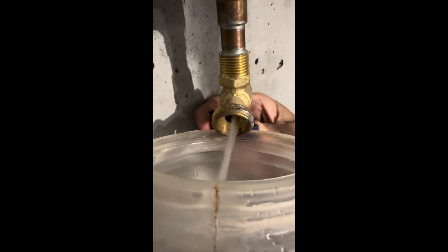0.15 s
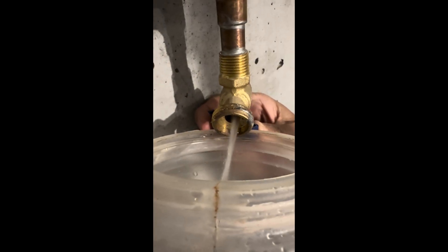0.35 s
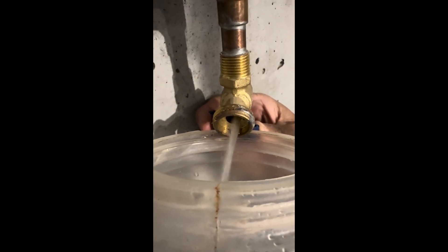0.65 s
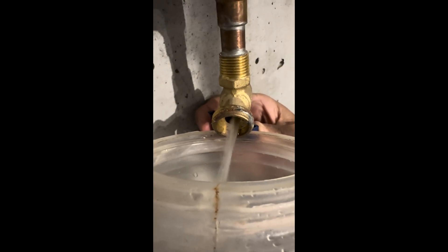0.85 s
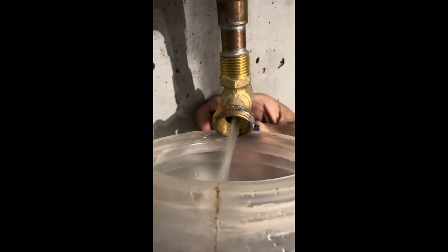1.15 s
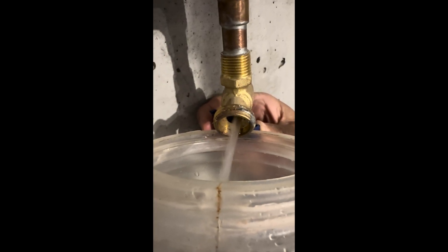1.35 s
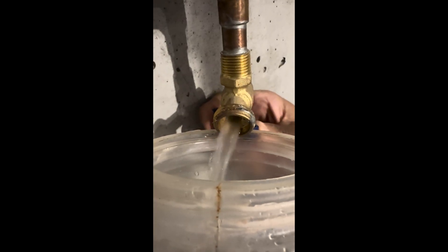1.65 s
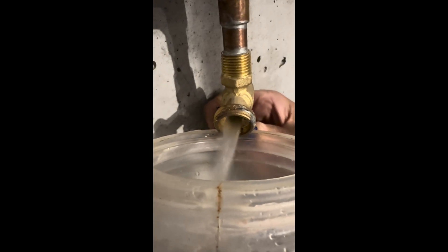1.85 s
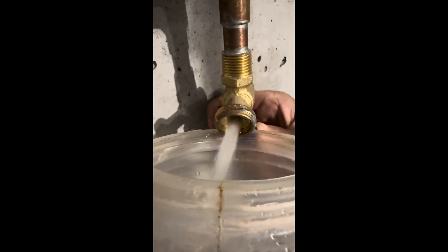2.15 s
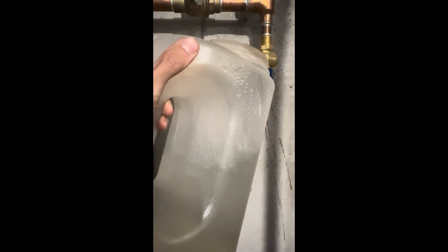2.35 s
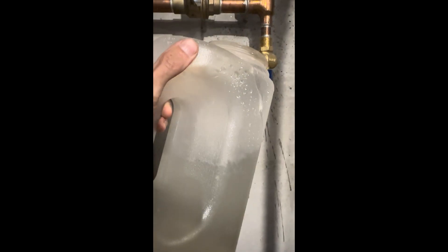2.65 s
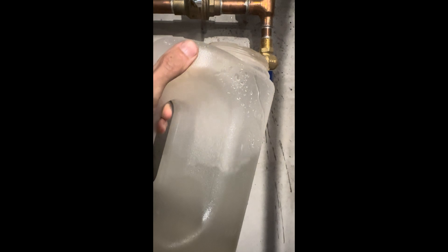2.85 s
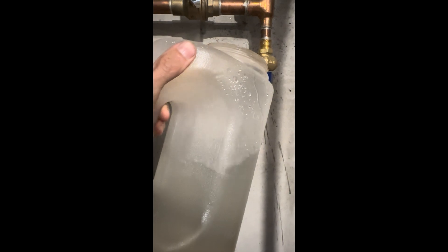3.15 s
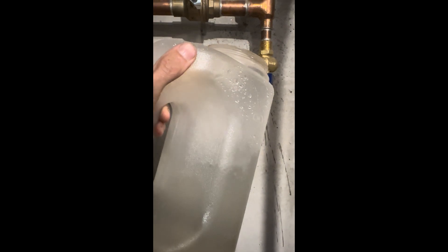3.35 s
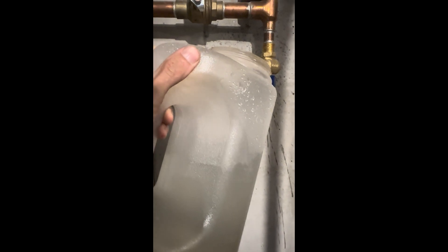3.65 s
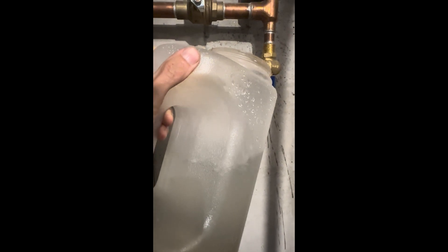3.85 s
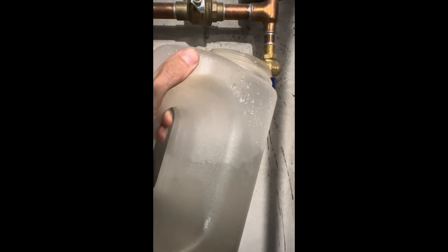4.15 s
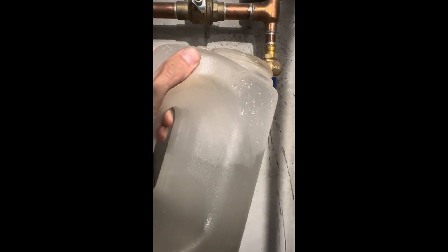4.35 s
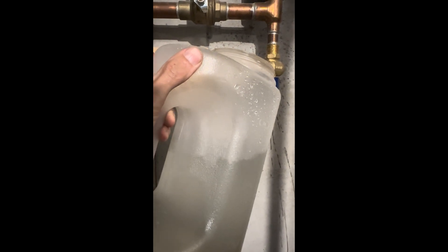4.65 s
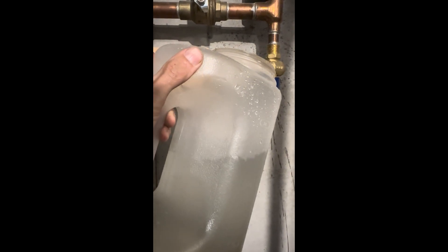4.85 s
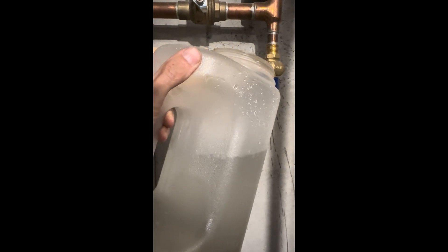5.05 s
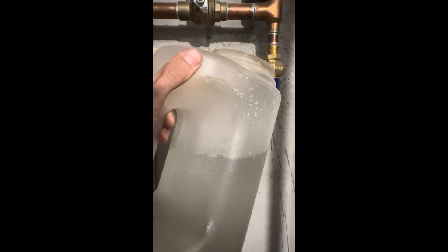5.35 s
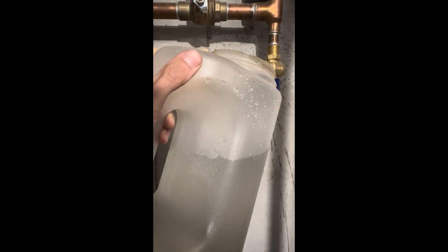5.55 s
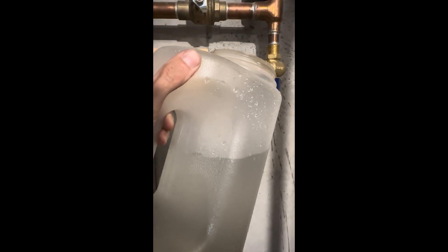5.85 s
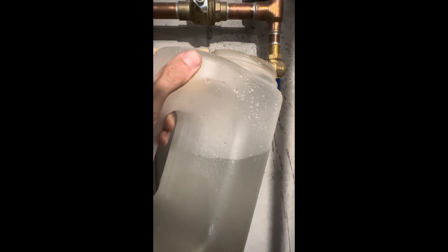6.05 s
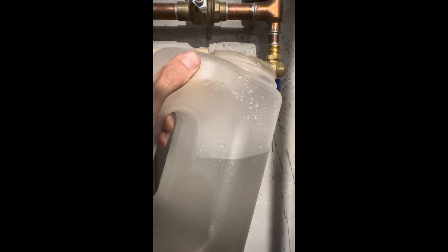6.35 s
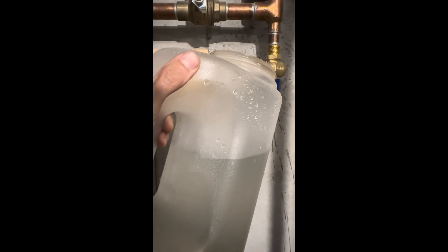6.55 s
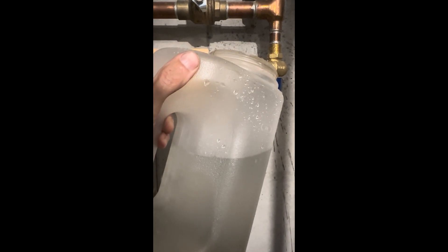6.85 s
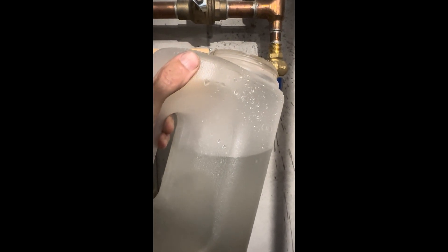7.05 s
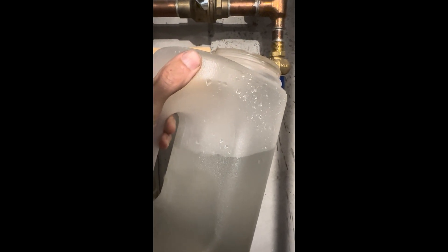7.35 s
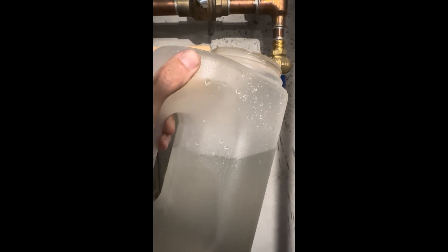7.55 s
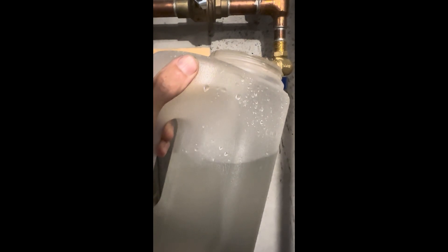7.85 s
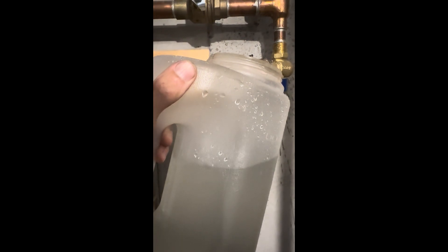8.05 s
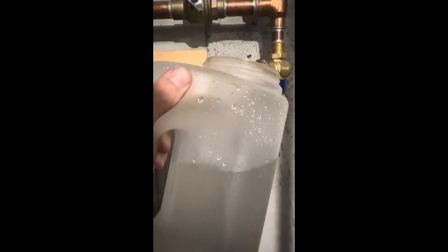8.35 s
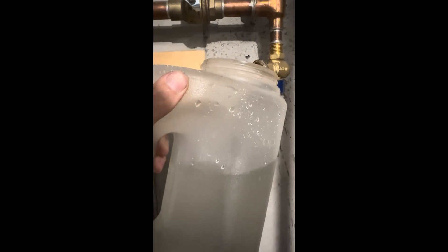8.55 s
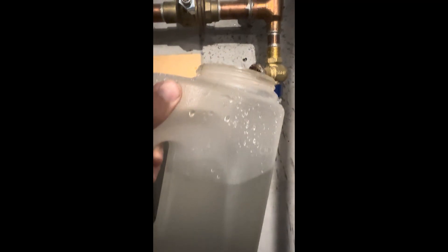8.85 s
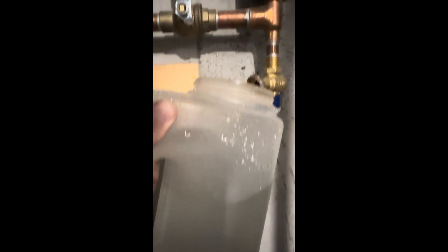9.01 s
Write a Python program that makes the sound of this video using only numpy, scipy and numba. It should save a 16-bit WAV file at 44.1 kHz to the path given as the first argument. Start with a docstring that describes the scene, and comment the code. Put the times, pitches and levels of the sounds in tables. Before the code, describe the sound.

From 0 to 1.6 s a steady thin stream falls into a nearly empty plastic jug, heard close over its mouth: low hollow boom around 200 Hz, busy bubbling, deep gulps and crisp droplet ticks. From 1.6 to 2.2 s the jet widens and hisses more, leaning to the right. At 2.2 s the view jumps beside the half-full jug: the loudest, densest rush, with a higher boom near 310 Hz and soft wall rumble. After 3 s it steadily weakens; by 4.2-5.3 s it is loose splatter and separate smacks, then lumpy, ringing plops until 6.2 s. Around 6.35 s it almost stops. At 6.5 s a short spurt thumps and plops, followed by a thinning dribble of round plinks and small rising chirps until 8.55 s. A few tiny high drips remain from 8.8 to 9.15 s above faint room air and machine hum.

```python
"""Filling a jug from a drain valve

Water runs from a brass drain valve into a hand-held plastic jug in a small utility room.
The jet drives bubbles and spray (many tiny ringing grains) and knocks the air in the jug into a boom:
low while nearly empty, higher once the jug is half full and heard from the side.
Then the flow weakens, stalls, spurts again and ends in single drips; a faint room tone and hum lie below.
"""
import sys
import numpy as np
from scipy import signal
from scipy.fft import rfft, irfft
from scipy.io import wavfile
from scipy.ndimage import uniform_filter1d
from numba import njit

SR = 44100
rng = np.random.default_rng(int(sys.argv[2]) if len(sys.argv) > 2 else 0)


def pcm_store(signal):
    """Save signal as 16-bit PCM."""
    levels = np.round(np.clip(np.atleast_2d(signal), -1, 1) * 32767)
    wavfile.write(sys.argv[1], SR, levels.astype(np.int16).T)


N = 404838
TIME = np.arange(N) / SR
LEAD = 256  # samples kept ahead of the direct sound in each response
HALF_FULL_S = 2.217  # when the jug is first heard half full
# random lesser plops and plinks fall between these times; lesser smacks also end at the second
STRAYS_FROM_S, STRAYS_TO_S = 6.5, 8.55


def from_db(db):
    """Decibels to gain."""
    return 10 ** (np.asarray(db) / 20)


def rms_one(x):
    """Scale to an average strength (rms) of 1."""
    return x / np.sqrt(np.mean(x ** 2) + 1e-20)


def in_time(rows):
    """Read the columns of a time table at every sample, in straight lines between its rows."""
    s, *columns = np.transpose(rows)
    return [np.interp(TIME, s, c) for c in columns]


def gain_at(points, hz):
    """Gains of a spectrum table, one row per dB column."""
    at, *columns = np.transpose(points)
    return from_db([np.interp(np.log(hz + 1), np.log(at), c) for c in columns])


def band(x, low_hz, high_hz, order=2):
    """Keep the sound between two frequencies."""
    sos = signal.butter(order, [low_hz, min(high_hz, .45 * SR)], "band", fs=SR, output="sos")
    return signal.sosfilt(sos, x + 1e-18)


def drift(rate):
    """Random wandering in straight lines between so many new values a second, each of spread 1."""
    knots = rng.standard_normal(N // 20)
    return np.interp(TIME * rate, np.arange(len(knots)), knots)


def add(track, s, sound):
    """Mix a short sound in at time s."""
    start = max(0, round(s * SR))
    track[start:start + len(sound)] += sound[:max(0, N - start)]


def bubble(hz, cycles, rise):
    """A sine that swells to 1 within so many cycles and dies, its pitch rising as it nears the surface."""
    age = np.arange(int(9 * cycles / hz * SR) + 2) * hz / (cycles * SR)
    swell = age * np.exp(1 - age)
    return swell * np.sin(2 * np.pi * cycles * age * (1 + rise * age))


def struck(hz, attack_s, decay_s, rise):
    """A sine that starts sharply and dies away, its pitch rising as it does."""
    t = TIME[:2048]
    envelope = (1 - np.exp(-t / attack_s)) * np.exp(-t / decay_s)
    return envelope * np.sin(2 * np.pi * hz * t * (1 + rise * t / decay_s))


def impacts(per_s, spread_db):
    """Random clicks of either sign, mostly small and a few large."""
    out = np.zeros(N)
    at = np.flatnonzero(rng.random(N) < per_s / SR)
    size = rng.exponential(1, N)[at]
    sign = np.sign(rng.random(N)[at] - .5)
    out[at] = sign * from_db(spread_db * np.minimum(size, 4))
    return out


def grains(clicks, low_hz, high_hz, cycles, rise, tilt_db, count=28):
    """Each click starts a bubble of one of several sizes, and so of one of several pitches."""
    out = np.zeros(N)
    at = np.flatnonzero(clicks)
    dealt = rng.integers(0, count, N)[at]
    for k, hz in enumerate(np.geomspace(low_hz, high_hz, count)):
        # tilt per octave, on top of a strength that grows with pitch
        gain = hz / low_hz * from_db(tilt_db * np.log2(hz / low_hz))
        shape = bubble(hz, cycles, rise) * gain
        starts = at[dealt == k]
        places = starts[:, None] + np.arange(len(shape))
        out += np.bincount(places.ravel(), np.outer(clicks[starts], shape).ravel(), N)[:N]
    return out


def strays(per_s, level_db, low_hz, high_hz, from_s, to_s):
    """Drops at loose intervals, of any pitch in a range, following a level curve: (s, dB, Hz)."""
    chance = rng.random((400, 3))
    s = from_s + (np.arange(len(chance)) + 2 * chance[:, 0]) / per_s
    spread_db = 4 * (-np.log(chance[:, 1] * .95 + .05) - 1)
    db = np.interp(s, TIME, level_db) + spread_db
    hz = low_hz * (high_hz / low_hz) ** chance[:, 2]
    return np.transpose([s, db, hz])[s < to_s]


@njit
def glide(x, angle, radius):
    """Two-pole resonance with a moving centre and width, gain about 1 on top."""
    y = np.zeros(len(x))
    for i in range(2, len(x)):
        r = radius[i]
        y[i] = (1 - r * r) / 2 * (x[i] - x[i - 2]) + 2 * r * np.cos(angle[i]) * y[i - 1] - r * r * y[i - 2]
    return y


def jug_response(modes, view, flutter_db, flutter_t60, room_db, room_t60, ports_hz, size=32768):
    """Sum and difference impulse responses: direct sound, flutter between the jug walls, room, air modes."""
    t = np.arange(size) / SR
    hz = np.arange(size // 2 + 1) * SR / size
    echoes = np.zeros((2, size))
    for level_db, t60 in ((flutter_db, flutter_t60), (room_db, room_t60)):
        # noise that falls by 60 dB in t60 seconds
        tail = rng.standard_normal((2, size)) * from_db(-60 * t / t60) * (t > .001)
        echoes += from_db(level_db) * band(tail, 445, 22600, order=1) / np.sqrt(np.sum(tail[0] ** 2))
    # above ports_hz the direct sound differs between the ports, a quarter cycle from the sum
    direct = np.array([np.ones(len(hz)), -1j * hz ** 2 / (hz ** 2 + ports_hz ** 2)])
    spectrum = rfft(echoes) + direct
    gains = gain_at(view, hz)
    for centre, width, db in modes:
        bell = 1 / (1 + (2 * (hz - centre) / width) ** 2) ** 1.81
        gains[0] *= np.sqrt(1 + (from_db(2 * db) - 1) * bell)
    # minimum phase: resonances ring after the blow
    phase = rfft(2 * irfft(np.log(gains[0]))[:size // 2], size).imag
    return np.roll(irfft(spectrum * gains * np.exp(1j * phase)), LEAD, axis=1)[:, :size // 2]


def in_jug(x, echo_db=0):
    """Sound from one spot in the jug; each stretch of the pour meets the jug as full as it then is."""
    # Modes and nulls of the air space as the jug fills.
    # Each row: centre in Hz, width in Hz, boost in dB.
    empty_modes = [(156.8, 25.5, 14), (231.2, 11.7, 9), (399, 130, 13), (680, 83, 14.5), (1146, 260, -8),
                   (1310, 53, 13), (1593, 123, 9), (2050, 37, 6), (2273, 410, -20), (2670, 190, 7),
                   (3430, 360, -13), (4660, 270, 0.5), (5010, 380, -5), (5710, 500, 8)]
    gush_modes = [(234, 36, 4.5), (407, 87, 6.5), (680, 95, 11), (1320, 32, 10.5), (1080, 51, 8),
                  (1580, 65, 13), (2124, 47, 8.5), (3020, 580, -9), (4000, 1100, 5.5), (5700, 660, 9)]
    half_modes = [(257.7, 31, 10.5), (350, 38, 8), (406, 29, -3.5), (670, 20, -1), (780, 250, -5),
                  (891, 27, 7.5), (1030, 190, 0.5), (1670, 59, 3.5), (1960, 310, 5.5), (3180, 1300, 3),
                  (4210, 104, 2.5), (5530, 140, 5), (6470, 330, 1.5)]
    full_modes = [(424, 86, 9.5), (606, 43, 4), (880, 330, 3), (814, 26, 4), (1775, 103, 13.5),
                  (2200, 370, -7.5), (2900, 680, -5), (2500, 48, 7.5), (3510, 180, 4.5), (5500, 730, 2.5)]
    lowered_modes = [(424, 69, 8.5), (606, 43, 2), (850, 190, 3), (1350, 400, -2), (2110, 230, 5),
                     (2980, 200, 2), (3600, 230, 3.5), (5600, 550, 1.5)]
    # Gain of the sum and difference per view: over the mouth, with the jug tilted, and beside it.
    # The sum has a deep dip near 13 kHz.
    # Each row: frequency in Hz, gain of the sum in dB, gain of the difference in dB.
    over_mouth = [(100, 3, 9), (256, 6, -4), (540, -8.5, 1), (780, -2, 8.5), (1220, -10, 6),
                  (1530, -2.5, 4.5), (2100, -1.5, -5), (3200, -7.5, -11), (5300, 1.5, -2), (6360, 2, -15),
                  (8150, 4.5, 1.5), (10540, 1, 4.5), (13000, -36, 3), (14700, 0, 7)]
    tilted = [(100, 9.5, 14), (230, 4, 3), (515, -2, 0), (770, 4.5, 13), (1370, -2.5, 7), (2900, 1, -4),
              (4970, -6.5, 0.5), (6370, -1.5, -14), (8400, 1.5, 0), (10800, -4.5, 1), (12900, -50, -3),
              (14700, -7, 0)]
    beside = [(100, 10.5, -14), (298, 2.5, -17), (590, 2.5, -7.5), (1060, 1.5, -15), (1810, -2.5, -53),
              (2750, -4, -3), (3950, -1, -6.5), (4890, -6.5, -3), (6100, 1.5, -17.5), (8440, -0.5, -1),
              (10730, -9.5, -3.5), (12800, -86, -7.5), (14800, -11.5, -2.5)]
    responses = [
        jug_response(empty_modes, over_mouth, flutter_db=echo_db - 5.0, flutter_t60=0.1,
                     ports_hz=150, room_db=-12.0, room_t60=0.1),
        jug_response(gush_modes, tilted, flutter_db=echo_db - 5.5, flutter_t60=0.036,
                     ports_hz=150, room_db=-8, room_t60=0.26),
        jug_response(half_modes, beside, flutter_db=echo_db - 1.0, flutter_t60=0.049,
                     ports_hz=5000, room_db=-8.0, room_t60=0.49),
        jug_response(full_modes, beside, flutter_db=echo_db + 0.9, flutter_t60=0.057,
                     ports_hz=5000, room_db=-15.0, room_t60=0.41),
        jug_response(lowered_modes, beside, flutter_db=echo_db + 1.5, flutter_t60=0.06,
                     ports_hz=5000, room_db=-10.5, room_t60=0.52)]
    # the jug is tilted and the jet widens; the flow stalls; the jug is lowered from the valve
    gush_s, stall_s, lowered_s = 1.61, 6.44, 8.03
    edges = [round(s * SR) for s in (0, gush_s, HALF_FULL_S, stall_s, lowered_s)] + [N]
    out = np.zeros((2, N + LEAD))
    for start, end, response in zip(edges, edges[1:], responses):
        heard = signal.fftconvolve(x[None, start:end], response, axes=1)[:, :N + LEAD - start]
        out[:, start:start + heard.shape[1]] += heard
    return out[:, LEAD:]


def at_level(pair, db, window_s):
    """Hold the running level of a grainy sound close to a curve."""
    window = int(window_s * SR)
    power = uniform_filter1d(uniform_filter1d(pair[0] ** 2, window), window)
    return pair * from_db(db) / np.sqrt(np.abs(power) + 1e-4 * np.mean(power))


def room_tone():
    """Faint steady air of the room, much alike on both sides, and the hum of a machine."""
    # Colour of the room's air noise. Each row: frequency in Hz, relative density in dB per Hz.
    colour = [(18, -36), (30, -14), (71, -6), (295, 4), (569, -13), (900, -13), (2290, -1), (5040, -11),
              (6050, -11), (9970, -10), (12000, -16.5), (16000, -42)]
    # Tones of the hum. Each row: frequency in Hz, level in dB.
    hum_tones = [(240, -82), (299.5, -78.5), (359.5, -83.5)]
    gains = gain_at(colour, np.arange(N // 2 + 1) * SR / N)
    noise = irfft(rfft(rng.standard_normal((2, N))) * gains, N)
    hum = sum(from_db(db) * np.sqrt(2) * np.sin(2 * np.pi * (hz * TIME + rng.random()))
              for hz, db in hum_tones)
    # rows: sum and difference of the two sides
    return from_db(-72) * rms_one(noise) * from_db([[-1], [-9]]) + hum * np.array([[1], [0]])


def jug_walls():
    """The soft plastic rumbles under the jet and, once half full, hums."""
    # The jet drums on the plastic. Each row: time in seconds, relative level of the rumble in dB.
    drumming = [(0, -59), (0.75, -75), (1.2, -72), (2.4, -62), (3.3, -63.5), (4.3, -63.5), (5.8, -64.5),
                (6.05, -75.5), (9.1, -75.5)]
    # The walls hum, most when the spurt after the stall hits them.
    # Each row: time in seconds, level of the hum in dB.
    wall_hum = [(2.2, -60), (4.4, -62), (5.4, -61.5), (6.45, -73.5), (6.5, -53.5), (6.76, -53.5),
                (6.86, -63.5), (7.4, -69), (8.7, -76.5), (9.04, -82), (9.14, -70)]
    rumble = rms_one(band(rng.standard_normal((2, N)), 48, 115, order=3))
    rumble = rumble * from_db(in_time(drumming)[0] - 1.0)
    noise = rng.standard_normal((2, N))
    hum = rms_one(band(noise, 149.6, 193, order=3) + from_db(-2.0) * band(noise, 246, 300))
    hum = hum * from_db(in_time(wall_hum)[0])
    return (rumble + hum * (TIME > HALF_FULL_S)) * from_db([[0], [-13]])


def air_boom(pitch, width_hz, per_s, leak_db):
    """The plunging water keeps knocking the air in the jug into a steep-sided resonance."""
    knocks = impacts(per_s, spread_db=2.5)
    angle = 2 * np.pi * pitch / SR
    radius = np.exp(-np.pi * width_hz / SR)
    boom = knocks + 1e-18
    for stage in range(3):
        boom = glide(boom, angle, radius)
    return boom + from_db(leak_db) * band(knocks, 187, 420, order=3)


def splashing(per_s, surge, patter_db, tick_db):
    """At one spot: bubbles and fine spray, and hard drop impacts that click through both ranges at once."""
    patter = surge * impacts(.4 * per_s, spread_db=5.5)
    bubbles = grains(surge * impacts(per_s / 2, spread_db=5.5), 443.6, 4380,
                     cycles=1.8, rise=0.012, tilt_db=-2.5)
    spray = grains(surge * impacts(1.3 * per_s, spread_db=7.0), 4274, 15480,
                   cycles=3.55, rise=0.0059, tilt_db=-1.1)
    bubbles = rms_one(bubbles) + from_db(patter_db) * rms_one(band(patter, 580, 3390, order=3))
    spray = rms_one(spray) + from_db(tick_db) * rms_one(band(patter, 3750, 14000, order=3))
    return np.array([in_jug(bubbles), in_jug(spray)])


def smacks(rows, spray_db):
    """A droplet hits with a snap, pings for a cycle or two and throws a short spatter."""
    out = np.zeros(N)
    t = TIME[:1024]
    snap = band(signal.unit_impulse(len(t)), 1080, 2530, order=1)
    # lesser smacks, 13 a second over two spots, follow the spray
    # they stop growing above a spray level of -47 dB, so a full jet drowns them
    stray_db = np.minimum(spray_db, -47) + 8
    lesser = [(s, db, hz, db - 34, -14)
              for s, db, hz in strays(13 / 2, stray_db, 3740, 8900, 0, STRAYS_TO_S)]
    for s, db, hz, snap_db, spatter_db in list(rows) + lesser:
        spatter = band(rng.standard_normal(len(t)) * np.exp(-t / 0.005), 2900, 15000, order=1)
        add(out, s + 0.000974, from_db(snap_db + 8.5) * snap / snap.max())
        add(out, s + 0.000979, from_db(db - 3.0) * bubble(hz, cycles=1.26, rise=0.0043))
        add(out, s, from_db(db + spatter_db + 3.5) * spatter)
    return out


def gulps(pitch):
    """Large air pockets dragged under give single strong swings of the air resonance."""
    # The largest pockets of air. Each row: start in seconds, relative strength in dB.
    pockets = [(0.134, -28.5), (0.292, -25.5), (0.451, -25), (0.513, -28.5), (0.561, -23), (0.598, -29),
               (0.647, -26), (0.70, -29.5), (0.775, -28.5), (0.873, -27.5), (1.142, -36), (1.711, -32),
               (1.862, -24.5), (1.983, -28), (2.071, -44), (2.229, -25), (3.196, -29), (3.331, -32),
               (4.232, -30), (4.295, -34), (4.458, -34.5), (4.482, -34), (4.56, -42), (4.614, -42),
               (5.222, -38.5), (5.245, -36), (6.106, -40), (6.132, -44)]
    out = np.zeros(N)
    for s, db in pockets:
        hz = pitch[min(N - 1, max(0, int(s * SR)))]
        add(out, s, from_db(db - 9.5) * bubble(hz, cycles=1.19, rise=0.011))
    return out


def chirps():
    """A bubble that rises to the surface sweeps its note up, shaken by the water around it."""
    # Single chirping bubbles.
    # Each row: start in seconds, length in seconds, first pitch in Hz, last pitch in Hz, relative level in dB.
    sweeps = [(2.052, .01, 1150, 1260, -46), (2.07, .009, 1480, 1580, -47), (2.142, .009, 1450, 1560, -48),
              (2.156, .012, 1260, 1400, -46), (2.527, .01, 1700, 1950, -42), (2.834, .012, 740, 900, -39),
              (3.965, .012, 1540, 1660, -44), (6.55, .025, 1770, 1820, -54), (6.792, .035, 1750, 1810, -58),
              (7.07, .03, 1810, 1880, -62), (7.118, .015, 1150, 1260, -53), (7.3, .035, 790, 830, -56),
              (7.455, .035, 600, 650, -57), (7.657, .014, 1400, 1560, -46), (7.68, .035, 790, 830, -56),
              (7.745, .022, 660, 740, -54), (7.858, .012, 1150, 1300, -54), (8.04, .02, 520, 680, -50),
              (8.125, .03, 580, 640, -54), (8.183, .045, 1030, 1850, -50), (8.238, .016, 950, 1250, -47),
              (8.44, .02, 1550, 1800, -60), (8.558, .009, 1000, 1200, -53), (8.574, .012, 1200, 1500, -55)]
    out = np.zeros(N)
    shake = 1 + 0.036 * drift(300)  # share of the pitch
    flicker = from_db(4 * drift(250))
    for s, length, from_hz, to_hz, db in sweeps:
        part = np.linspace(0, 1, int(length * SR))
        hz = (from_hz + (to_hz - from_hz) * part) * shake[int(s * SR):][:len(part)]
        turns = np.cumsum(hz) / SR
        swell = 2 * np.sqrt(part * (1 - part))
        add(out, s, from_db(db) * swell * np.sin(2 * np.pi * turns))
    return out * flicker


def plops(rows, pitch, bubbles_db):
    """A drop slaps the surface, splashes, thuds the air above and leaves a ringing bubble; lesser ones plink."""
    out = np.zeros(N)
    t = TIME[:2048]
    slap = band(signal.unit_impulse(len(t)), 590, 2700)
    for s, db, hz, thud_db, slap_db in rows:
        splash = band(rng.standard_normal(len(t)) * np.exp(-t / 0.0051), 465, 1620)
        # chance in the ringing time and in the pitch of the thud
        ring, swing = from_db(rng.normal(0, [.8, .5]))
        thud_hz = swing * pitch[int(s * SR)]
        drop = from_db(slap_db + 4.0) * slap / np.abs(slap).max()
        drop += from_db(slap_db) * splash / np.abs(splash).max()
        drop += from_db(db - 5.5) * struck(hz, attack_s=0.00097, decay_s=0.0034 * ring, rise=0.015)
        drop += from_db(thud_db - 2.0) * struck(thud_hz, attack_s=0.0016, decay_s=0.0053, rise=0.023)
        add(out, s + 0.000984, drop)
    # over two spots: 26 lesser plops and 30 higher plinks a second, following the bubbles
    for s, db, hz in strays(26 / 2, bubbles_db + 2.5, 540, 1193, STRAYS_FROM_S, STRAYS_TO_S):
        add(out, s, from_db(db + 2) * struck(hz, attack_s=0.00093, decay_s=.005, rise=0.032))
    for s, db, hz in strays(30 / 2, bubbles_db + 3, 1034, 1890, STRAYS_FROM_S, STRAYS_TO_S):
        add(out, s, from_db(db) * struck(hz, attack_s=0.00054, decay_s=0.0055, rise=0.014))
    return out


def drips():
    """Single drips into calm water ring briefly at a high pitch, with a pinch of spatter around it."""
    # The last drips. Each row: start in seconds, relative strength in dB, pitch in Hz.
    last_drips = [(8.8322, -45.5, 6800), (8.8355, -48, 6400), (8.907, -50, 2450), (8.9102, -45, 3250),
                  (9.0148, -39.5, 4030), (9.0168, -42, 4300), (9.141, -42.5, 6750)]
    out = np.zeros(N)
    t = TIME[:1024]
    for s, db, hz in last_drips:
        spatter = band(rng.standard_normal(len(t)) * np.exp(-t / .004), 0.79 * hz, 1.35 * hz)
        add(out, s, from_db(db) * bubble(hz, cycles=2.0, rise=0.005))
        add(out, s, from_db(db - 8) * spatter)
    return out


def scene():
    """Stream and drops sound through the jug; the finer the jet breaks up, the more grains it makes."""
    # The stream swells, thins and stalls; then a spurt and a dribble that dies away.
    # Each row: time in seconds, then relative levels in dB of the spray, the bubbles and the air boom.
    stream = [(0, -48.5, -44, -36.5), (0.6, -48.5, -44, -36.5), (1.05, -49, -44, -39),
              (1.52, -51, -43.5, -43.5), (1.63, -52, -51, -41), (1.76, -45.5, -46, -41),
              (2.205, -38.5, -43.5, -38), (2.235, -36, -40, -34.5), (2.8, -35, -41.5, -35),
              (3.55, -40, -44, -37), (4.15, -44.5, -48, -43.5), (4.4, -46.5, -49.5, -51.5),
              (4.62, -48.5, -49.5, -54), (4.75, -49, -51, -61.5), (5.05, -51, -52, -62),
              (5.3, -53.5, -53, -54.5), (5.62, -50, -48.5, -52), (5.95, -51.5, -52.5, -58),
              (6.15, -50.5, -50, -48), (6.34, -70.5, -60, -68)]
    dribble = [(6.46, -65, -70, -87), (6.5, -55, -47, -58), (6.72, -55, -52, -55), (6.9, -60.5, -59, -59),
               (7.4, -57.5, -59, -56.5), (7.72, -62, -56.5, -64), (7.95, -61.5, -63.5, -58),
               (8.25, -71, -61, -55.5), (8.55, -71, -62.5, -72), (8.72, -69.5, -74, -91)]
    # Air resonance of the jug. Each row: time in seconds, pitch in Hz, width of each filter stage in Hz.
    air_pitch = [(0, 202.5, 130), (2.2, 209, 135), (2.214, 310.6, 113), (3.3, 313.6, 114), (4.4, 313, 119),
                 (5.3, 410, 200), (6.2, 392, 173), (6.5, 444, 240), (9.18, 487, 250)]
    # How finely the jet breaks up. Each row: time in seconds, bubbles per second.
    breakup = [(0, 3080), (1.6, 2390), (2.3, 6400), (3.3, 5070), (4.5, 900), (6.1, 500), (6.5, 640),
               (8.3, 640), (9.18, 500)]
    # The body of the sound leans to one side. Each row: time in seconds, left minus right in dB.
    lean = [(0, 1), (1.1, 1), (1.7, -11.5), (2.2, -5), (2.23, -2), (6.5, 0.6), (9.18, -2.5)]
    # The patter leads at first, bubbles lead around 5.6 s, and the two are near equal in the dribble.
    # Each row: time in seconds, patter over bubbles in dB.
    hardness = [(0, 9), (2.3, 5.5), (4.8, 1), (5.6, -5), (7, 1)]
    # The loudest drops that trap a ringing bubble. Each row: start in seconds, strength of the ring in dB,
    # bubble pitch in Hz, thud in dB, slap in dB (relative levels).
    plop_rows = [(5.344, -39, 950, -53, -41.5), (5.419, -39, 660, -51, -51), (5.462, -39, 891, -39, -56),
                 (5.49, -32, 662, -47, -44), (5.545, -43, 958, -45, -46), (5.588, -33, 1030, -47, -52),
                 (5.614, -30, 673, -57, -47), (5.678, -27, 900, -35, -34.5), (5.779, -35, 649, -50, -56),
                 (5.832, -35, 1150, -61, -50), (5.861, -32, 624, -50, -43), (5.971, -40, 1060, -54, -43),
                 (6.041, -44, 931, -44, -46), (6.087, -38, 1090, -50, -41), (6.106, -31, 1280, -37, -42),
                 (6.162, -31, 1100, -50, -54), (6.167, -34, 680, -45, -54), (6.488, -30, 910, -34, -48),
                 (6.522, -22, 1090, -40, -30), (6.587, -44, 1120, -50, -45), (6.604, -31, 890, -34.5, -48),
                 (6.624, -33, 829, -48, -37), (6.642, -42, 775, -40, -43), (6.66, -20.5, 1160, -51, -40),
                 (6.692, -24.5, 715, -36, -34.5), (6.729, -28.5, 905, -38, -38.5),
                 (6.788, -25.5, 670, -35, -42), (6.809, -44, 654, -49, -46), (6.904, -40, 633, -44, -52),
                 (6.9655, -36, 900, -46, -50), (6.9685, -20, 996, -42, -43), (7.011, -31.5, 570, -42, -53),
                 (7.147, -30, 694, -41, -53), (7.189, -30, 603, -52, -46), (7.198, -33, 1090, -54, -58),
                 (7.218, -38, 606, -53, -56), (7.246, -39, 1040, -43, -48), (7.261, -37, 1080, -53, -51),
                 (7.289, -24, 840, -44, -45), (7.351, -37, 810, -52, -53), (7.362, -40, 689, -59, -56),
                 (7.428, -34, 1030, -54, -53), (7.444, -31, 660, -42, -46), (7.509, -52, 886, -55, -47),
                 (7.542, -35, 1160, -49, -50), (7.578, -34, 990, -58, -52), (7.629, -41, 993, -57, -48),
                 (7.652, -30, 1140, -54, -40.5), (7.67, -28, 920, -47, -42), (7.709, -36, 900, -57, -55),
                 (7.736, -30.5, 1030, -54, -43.5), (7.803, -33, 595, -55, -52), (7.819, -35, 806, -44, -54),
                 (7.861, -38, 810, -50, -54), (7.882, -30.5, 890, -40, -52), (7.907, -43, 565, -46, -64),
                 (7.962, -39, 537, -43, -61), (8.052, -42, 590, -60, -68), (8.112, -30.5, 577, -43, -48),
                 (8.153, -32, 606, -38.5, -47), (8.23, -21.5, 884, -54, -41), (8.298, -32, 960, -54, -53),
                 (8.329, -39, 646, -54, -58), (8.373, -42, 662, -58, -75), (8.412, -40, 700, -47, -69),
                 (8.462, -43, 880, -61, -61), (8.511, -42, 883, -63, -73)]
    # The loudest droplets that smack on water and plastic. Each row: start in seconds,
    # strength of the ping in dB, ping pitch in Hz, snap in dB, spatter relative to the ping in dB.
    smack_rows = [(0.3083, -25.5, 7300, -47, -14.5), (0.5132, -30, 6500, -52, -14),
                  (0.5806, -40, 5730, -30, -21), (0.6627, -26, 6900, -33.5, -16),
                  (0.7502, -40, 5660, -44, -18), (1.0385, -37, 5630, -48, -12),
                  (1.2415, -38, 9500, -36, -8), (1.4396, -33, 8720, -49, -8), (1.098, -39, 2720, -35, -12),
                  (1.3827, -33.5, 6000, -52, -6), (1.51, -38, 2710, -44, -4),
                  (1.7952, -16.5, 6760, -40, -12.5), (1.8718, -25.5, 3700, -52, -22),
                  (2.0358, -26.5, 5800, -41, -11), (2.6743, -21.5, 3720, -55, -12),
                  (2.7227, -17, 7300, -44, -20), (2.8774, -24, 7360, -32, -9),
                  (2.7985, -24, 7350, -21.5, -7), (3.072, -28.5, 6460, -30, 3.5),
                  (3.6589, -28, 5900, -28, -2), (4.0173, -29, 5500, -39, -27),
                  (4.051, -47, 4330, -32.5, -14), (4.1829, -37, 4040, -46, -16),
                  (4.1277, -23, 6650, -37, -14), (4.1911, -23.5, 3900, -31.5, -10),
                  (4.2225, -27.5, 6800, -42, -6.5), (4.2782, -42, 1870, -38, 2),
                  (4.3245, -35, 4520, -48, -16), (4.344, -33, 3500, -36, -8), (4.3528, -32, 2040, -39, -8),
                  (4.368, -35, 3000, -38, -7), (4.4284, -28, 4310, -38, -11), (4.4575, -30, 3460, -39, -9),
                  (4.4739, -36, 1720, -29.5, -4), (4.544, -40, 1060, -36, -12), (4.578, -40, 1000, -42, -9),
                  (4.6139, -37, 3800, -39.5, -19), (4.7127, -33, 2500, -46, -20),
                  (4.7461, -35.5, 3320, -41, -10), (4.769, -40, 2400, -45, -16),
                  (4.778, -31, 6460, -55, -14), (4.793, -29, 6300, -41, -16), (4.8768, -46, 2020, -35.5, 3),
                  (4.927, -35, 2000, -33, -5), (4.9648, -39, 2300, -37, -4), (4.994, -37, 2930, -50, -4),
                  (5.1115, -22, 2500, -33, -19), (5.1595, -31.5, 2480, -42, -19),
                  (5.199, -32, 6800, -55, -13), (5.244, -42, 2780, -42, -5), (5.273, -37, 4800, -47, -13),
                  (5.3377, -53, 2000, -44, -15), (5.421, -36, 6840, -52, -4.5),
                  (5.5442, -31.5, 3250, -50, -24), (5.7139, -20, 6470, -36, -13),
                  (5.8403, -22.5, 6000, -55, -21), (5.9818, -30, 3570, -42, -16),
                  (6.018, -38, 3600, -43, -10), (6.0405, -34.5, 3600, -50, -3.5),
                  (6.0505, -34, 3280, -54, -9), (6.063, -37, 3700, -47, -12),
                  (6.104, -29, 3950, -36, -10.5), (6.4165, -53, 3360, -44.5, -3),
                  (6.443, -53, 3400, -50, 1), (6.4854, -39, 3350, -32, 0), (6.5215, -38, 3300, -35, -10),
                  (6.545, -34, 1800, -53, -30), (6.5882, -25.5, 2180, -46, -13),
                  (6.6233, -26, 3100, -33, -33), (6.7157, -23, 2770, -55, -18.5),
                  (6.8437, -31, 5530, -60, -15), (6.9017, -37, 6040, -61, -1), (6.949, -32, 2900, -46, -23),
                  (7.01, -39.5, 6100, -54, -7), (7.1418, -30, 6640, -63, -15),
                  (7.2895, -23.5, 6200, -39.5, -11), (7.3462, -22.5, 7900, -54, -22),
                  (7.255, -33.5, 6000, -53, -10.5), (7.423, -36, 5300, -59, -15),
                  (7.444, -37, 6100, -57, -9), (7.4686, -30.5, 6370, -49, -26),
                  (7.508, -35, 7100, -56, -15), (7.58, -39, 5700, -56, -18), (7.606, -32.5, 5960, -58, -17),
                  (7.6264, -34, 8230, -50, -6), (7.651, -28.5, 5750, -31.5, -17),
                  (7.729, -35, 4260, -56, -17), (7.9616, -43, 7600, -50, -0.5), (7.992, -40, 6600, -56, -6),
                  (8.043, -41, 6200, -58, -10), (8.0608, -37.5, 8420, -45, -7),
                  (8.187, -36, 5900, -60, -14), (8.229, -45, 3000, -52, -7), (8.255, -43, 7600, -62, -12),
                  (8.111, -31, 6200, -44, -5.5), (8.154, -30, 5840, -53, -20),
                  (8.199, -36.5, 6600, -62, -8), (8.412, -15.5, 10700, -66, -27),
                  (8.54, -42.5, 3200, -62, -9), (8.645, -49, 2200, -63, -24), (8.844, -50, 1210, -59, -16),
                  (9.113, -61, 1200, -58, -14.5), (9.134, -62, 1010, -52.5, -8)]

    spray_db, bubbles_db, boom_db = in_time(list(stream) + list(dribble))
    pitch, width = in_time(air_pitch)
    # the sloshing surface makes the air resonance waver
    pitch = pitch * np.exp(0.018 * drift(20))
    per_s = in_time(breakup)[0]
    lean_db = in_time(lean)[0]
    hardness_db = in_time(hardness)[0]
    surge = from_db(2.0 * drift(70))  # the jet breaks into lumps
    glug_db = 2.0 * drift(22)  # and drags air under unevenly

    bubbles, spray = sum(splashing(per_s, surge, patter_db=hardness_db, tick_db=hardness_db - 6.0)
                         for spot in range(2))
    boom = in_jug(air_boom(pitch, width, .14 * per_s, leak_db=-20.5))
    pair = at_level(boom, boom_db + glug_db, window_s=0.042)
    # the bubbling follows only a share of the glugging
    pair += at_level(bubbles, bubbles_db + 0.66 * glug_db - 1.32, window_s=0.049)
    pair += at_level(spray, spray_db - .8, window_s=0.36)

    # the listed drops land on two spots in turn
    near = plops(plop_rows[::2], pitch, bubbles_db) + smacks(smack_rows[::2], spray_db)
    near += gulps(pitch) + drips()
    far = plops(plop_rows[1::2], pitch, bubbles_db) + smacks(smack_rows[1::2], spray_db) + chirps()
    # single drops land in plain line of the mouth: stronger, with less flutter than the stream
    drop_db, drop_echo_db = 2, -3.5
    pair += from_db(drop_db) * (in_jug(near, drop_echo_db) + in_jug(far, drop_echo_db))

    total, difference = pair + jug_walls() + room_tone()
    lean_share = (from_db(lean_db) - 1) / (from_db(lean_db) + 1)
    difference = difference + lean_share * band(total, 30, 1100, order=1)
    return np.array([total + difference, total - difference])


def record(dry):
    """Cut the top steeply above 16100 Hz."""
    return signal.sosfilt(signal.ellip(10, .2, 70, 16100, fs=SR, output="sos"), dry)


dry = scene()
out = record(dry)
pcm_store(out)
```